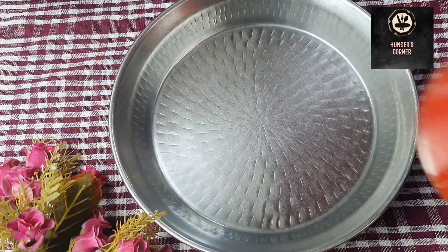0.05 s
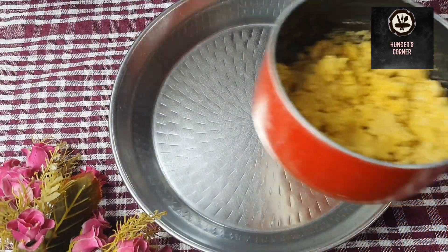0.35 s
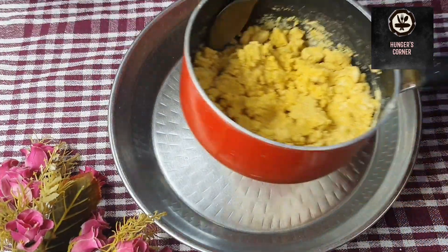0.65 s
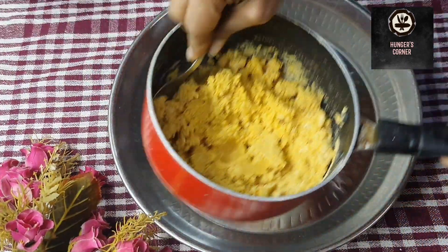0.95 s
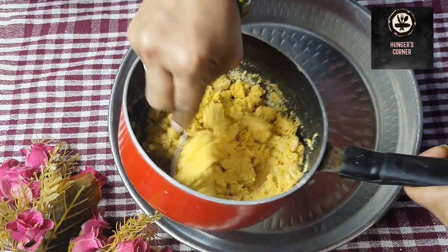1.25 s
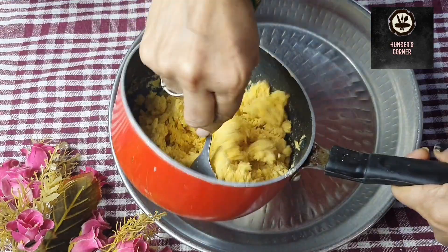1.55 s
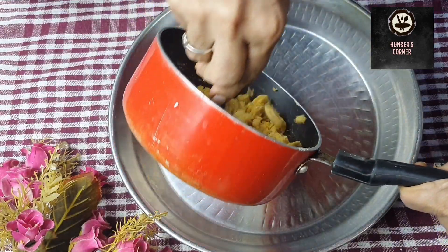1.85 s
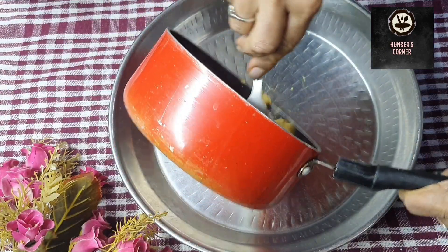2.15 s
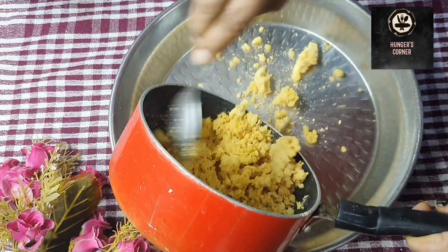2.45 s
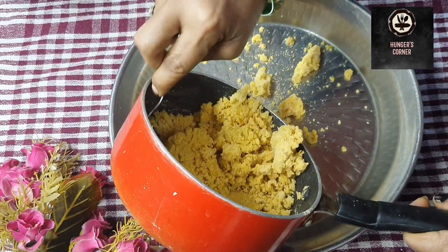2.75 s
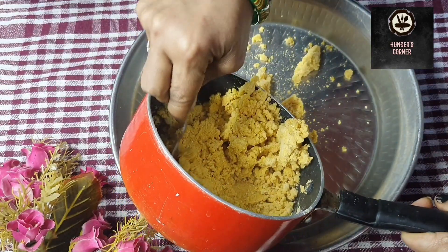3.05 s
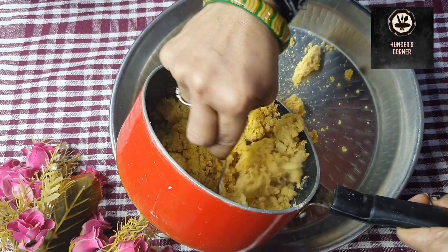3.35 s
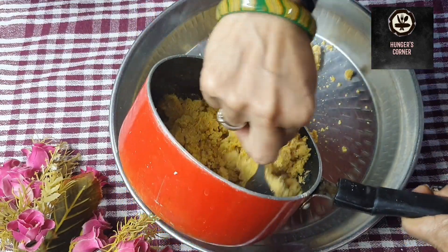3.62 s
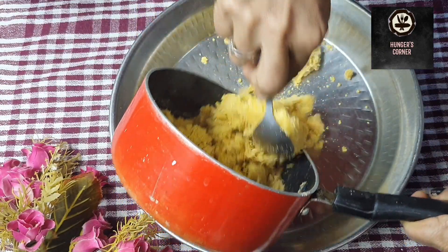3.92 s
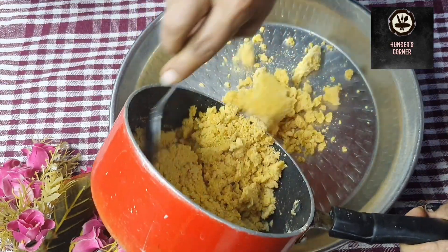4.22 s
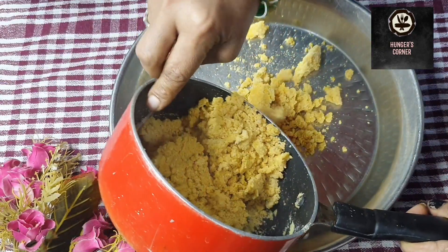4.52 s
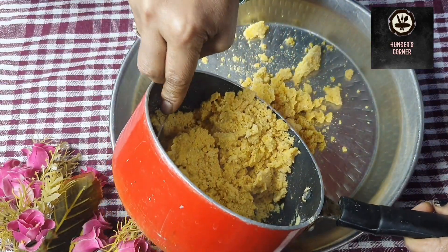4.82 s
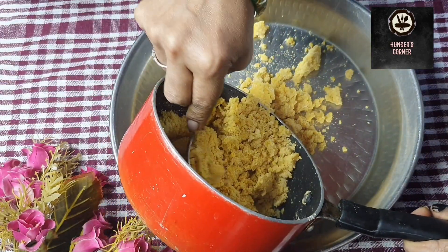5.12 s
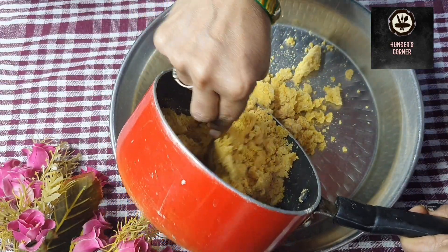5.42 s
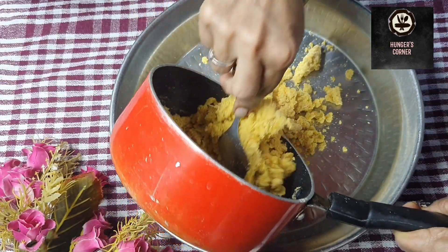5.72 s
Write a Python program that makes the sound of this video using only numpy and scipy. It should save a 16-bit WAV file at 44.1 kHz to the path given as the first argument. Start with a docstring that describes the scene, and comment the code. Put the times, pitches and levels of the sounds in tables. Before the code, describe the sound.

Gritty spoon scrapes and sharp clinks in a saucepan, with a few booming bumps on a steel plate in a small kitchen.

```python
"""Cloth swishes, then a metal spoon knocks and scrapes crumbly food out of a saucepan in a small kitchen.
Each knock excites the damped modes of wall, bottom and spoon; stick-slip friction sounds the pan's hollow.
The pan bumps a steel plate below it, which rings and booms on the table, and crumbs patter down.
Near walls add a short reverberation, and a low hum runs underneath."""
import sys
import numpy as np
from scipy import signal
from scipy.io import wavfile
from scipy.ndimage import uniform_filter1d

SR = 44100
rng = np.random.default_rng(int(sys.argv[2]) if len(sys.argv) > 2 else 0)


def transcribe(u):
    """Save the signal u as a 16-bit wav file named by the first command-line argument.

    u: samples, shape (n,) or (channels, n), limited to [-1, 1]; the rate is SR.
    q: integer samples, one column per channel.
    """
    v = np.clip(np.atleast_2d(u).T, -1, 1)
    q = np.round(v * 32767).astype(np.int16)
    wavfile.write(sys.argv[1], SR, q)


N = 259256
TIME = np.arange(N) / SR
AGE = np.arange(SR) / SR  # seconds since a blow
# spoon modes: frequency_hz, t60_s, gain_db
SPOON_MODES = [(360, 0.21, -6), (1795, 0.2, -3.5), (1806, 0.29, -3.5), (2610, 0.21, 6.5),
               (4760, 0.15, -8.5), (4737, 0.15, 4), (4940, 0.11, -11), (6040, 0.11, -9.5),
               (7520, 0.12, -12), (8020, 0.04, -6.5), (9400, 0.12, -25.5), (10550, 0.099, -25)]


def spoon_knocks():
    """Modal excitation: a blow rings wall, bottom and spoon; its height weights the wall's modes."""
    # start_s, clack_db, tilt_db_per_octave, contact_s, left_db, wall_db, height_0_to_1,
    # spoon_db, bottom_db
    knocks = [(0.7258, -35, -3.5, 0.0013, 3.5, -42, 0, -48.5, -35.5),
              (0.7979, -27.5, -1, 0.00031, -1, -68, 0.5, -66, -32),
              (1.2405, -55.5, 7, 0.0024, 4, -60.5, 0, -87, -44),
              (1.279, -55.5, 0.5, 0.003, -1.5, -61, 0, -79.5, -45.5),
              (2.636, -32.5, 1.16, 0.0048, 1.5, -30, 1, -40.5, -40),
              (2.948, -55, -1, 0.0049, 4.5, -54, 0.15, -69, -77.5),
              (3.701, -59.5, 2.5, 0.0068, 6, -51.5, 0.35, -80, -57.5),
              (4.31, -59, -4.5, 0.0047, 2.5, -62.5, 0.4, -78, -75.5),
              (4.4346, -22.5, 6, 0.0036, 2, -35.5, 0.7, -21.5, -55),
              (4.7330, -55, -9.5, 0.011, -2.5, -47.5, 0.24, -73, -49.5),
              (5.1590, -52, 3.5, 0.012, 3.5, -26.5, 0.05, -54, -44),
              (5.1900, -51, -1, 0.013, 4, -40.5, 0.6, -81, -45.5),
              (5.512, -65.5, -9, 0.0032, 1, -66, 0, -97, -66)]
    # pan wall modes: frequency_hz, t60_s, struck_low_db, struck_at_rim_db
    wall_modes = [(227.7, 0.13, -7, -23), (452, 0.29, -19, -28), (675, 0.23, -10, -20.5),
                  (789, 0.18, -19.5, -9.5), (888, 0.22, -2, -13), (935, .15, -16, -10),
                  (1130, 0.13, -1, -40), (1161.5, 0.17, -1, -22.5), (1408, 0.1, -4.5, 6),
                  (1517, 0.094, 0.5, -26.5), (1562, 0.1, 6, -31.5), (1852, 0.2, -8.5, -21.5),
                  (2223, 0.18, -36.5, -0.5), (2253, 0.28, -12, -18), (3110, 0.15, -25.5, -7.5),
                  (3215, .14, -21, -14), (3521, 0.16, -17, -11), (3815, .12, -25, -15),
                  (4200, 0.07, -23, -18.5)]
    # pan bottom modes, damped by food: frequency_hz, t60_s, gain_db
    bottom_modes = [(313, 0.14, -12), (730, 0.03, 2), (821, 0.2, -1), (886, 0.033, 7.5), (1322, 0.28, -5.5)]
    # the pan's dense modes: frequency_hz, gain_db
    spectrum = [(100, -20.5), (330, -4.5), (530, -5), (800, -6.5), (1100, -4), (1450, 4.5), (2300, -1),
                (3300, -6), (5000, -10.5), (8000, -19), (14000, -28.5)]
    hz, t60, low_db, rim_db = np.transpose(wall_modes)
    spoon_hz, spoon_t60, mode_db = np.transpose(SPOON_MODES)
    octaves = np.log2(np.maximum(spoon_hz / 2600, 1))
    out = np.zeros((2, N))
    for s, db, tilt, contact, left_db, wall_db, height, spoon_db, bottom_db in knocks:
        wall = np.transpose([hz, t60, low_db + height * (rim_db - low_db)])
        # a hard, bright blow reaches the spoon's high modes
        spoon = np.transpose([spoon_hz, spoon_t60, mode_db + 2.22 * tilt * octaves])
        sound = gain_of(db) * clack(spectrum, tilt, contact, body_db=-14, decay_s=0.014, shared=0.046)
        sound += gain_of(wall_db) * ring(wall, contact, apart_rad=1.7, wobble=0.0064)
        sound += gain_of(spoon_db) * ring(spoon, contact / 2, apart_rad=0.46, wobble=0.011)
        sound += gain_of(bottom_db) * ring(bottom_modes, contact / 2, apart_rad=0.83, wobble=0.065)
        add(out, s, placed(sound, left_db))
    return out


def plate_bumps():
    """Impact and coupling: the pan strikes the plate, and once a lump of food drops onto it; the plate clacks,
    rings and booms on the table."""
    # start_s, clack_db, tilt_db_per_octave, contact_s, left_db, ring_db, boom_db
    bumps = [(1.8026, -24.5, 4.5, 0.0043, 3.5, -32.5, -24), (1.8650, -31.5, -3, 0.0029, 0, -53, -33),
             (2.3281, -47.5, 2.5, 0.008, 3.5, -52.5, -50), (2.722, -56.5, -13, 0.0036, -19, -72, -69),
             (2.9900, -35, -0.5, 0.0044, 2, -54, -41), (3.1407, -36.5, -1, 0.0039, 3.5, -71, -41.5),
             (3.192, -53, -3.5, 0.0054, -6, -69, -47.5), (5.19, -65, -9, 0.0067, -2.5, -52.5, -55.5)]
    # steel plate modes: frequency_hz, t60_s, gain_db
    plate_modes = [(318, 0.38, 1.5), (357.7, 0.24, 3), (422, 0.25, 2), (484, 0.39, -0.5),
                   (687, 0.27, -11.5), (1110, 0.11, 10.5), (1313, 0.21, 6.5), (1650, 0.076, -5.5),
                   (1868, 0.3, 5), (2030, 0.65, -5), (3435, 0.12, -5.5), (5100, 0.16, 6), (5230, 0.2, -5.5),
                   (5850, 0.28, -9.5), (6880, 0.47, -14.5)]
    # the plate bouncing on the table: frequency_hz, t60_s, gain_db
    boom_modes = [(77.5, 0.44, -2), (107.7, .25, 0), (147.5, 0.39, -5), (178, 0.33, -4), (192.6, 0.11, 7.5),
                  (231.6, 0.26, -10)]
    # the plate's dense modes: frequency_hz, gain_db
    spectrum = [(100, -16.5), (200, -6), (420, -2.5), (580, -4), (1100, 2), (2000, 2), (3000, -3),
                (4000, -9), (5200, -4), (6800, -12), (8200, -19), (14000, -26)]
    hz, t60, mode_db = np.transpose(boom_modes)
    hardest_db = max(row[-1] for row in bumps)
    out = np.zeros((2, N))
    for s, db, tilt, contact, left_db, ring_db, boom_db in bumps:
        sound = gain_of(db) * clack(spectrum, tilt, contact, body_db=-9, decay_s=0.02, shared=0.18)
        sound += gain_of(ring_db) * ring(plate_modes, contact, apart_rad=0.71, wobble=0.0033)
        # a softer bump moves mainly the lowest mode
        modes = np.transpose([hz, t60, mode_db + 0.67 * (boom_db - hardest_db) * np.log2(hz / hz[0])])
        boom = gain_of(boom_db) * ring(modes, rise_s=0.0081, apart_rad=0.35, wobble=0.062)
        add(out, s, placed(sound, left_db) + placed(boom, left_db=5))
    return out


def scraping():
    """Stick-slip friction: the spoon's edge slips on grit and metal, hisses and drives resonances."""
    # peak_s, rise_s, hold_s, release_s, rub_db, hiss_db, hollow_hz, hollow_db
    strokes = [(0.734, 0.046, 0.17, 0.078, -52, -55.5, 800, 2.5),
               (0.877, 0.042, .02, 0.054, -42, -49, 787, 3.5),
               (0.903, 0.038, 0.031, 0.17, -35.5, -44.5, 814, -4),
               (1.076, 0.031, 0.0031, 0.047, -46, -53, 820, -3),
               (1.359, 0.27, 0.013, 0.04, -51, -54, 825, 2.5), (1.401, 0.022, .12, 0.067, -56, -62, 800, 7),
               (2.069, 0.24, 0.038, 0.13, -55, -58.5, 1240, -10.5),
               (2.267, 0.074, 0.017, 0.055, -50.5, -52.5, 1240, -21.5),
               (2.346, 0.08, 0.13, 0.33, -56, -59.5, 1190, -0.5),
               (3.258, 0.085, 0.068, 0.013, -46.5, -62.5, 1050, 2),
               (3.33, 0.076, .008, .12, -77, -57.5, 1478, -16.5),
               (3.656, 0.18, .005, 0.14, -68.5, -63, 900, 4),
               (3.726, 0.09, 0.068, 0.034, -61, -70, 890, 6.5),
               (3.909, 0.065, .03, 0.073, -66, -59, 2250, -1),
               (3.953, 0.04, 0.013, .06, -52, -54.5, 2320, 0.5),
               (3.988, .03, 0.0073, .04, -49, -58, 2000, -3),
               (4.163, .03, 0.075, 0.41, -62.5, -71.5, 1180, -8),
               (4.841, 0.3, .04, 0.29, -64, -72.5, 980, -0.5),
               (5.062, 0.15, 0.0074, 0.11, -55, -66.5, 1000, 8.5),
               (5.155, .04, 0.034, 0.05, -62, -70, 1000, 7),
               (5.553, 0.24, 0.0067, 0.065, -56.5, -66.5, 1055, 5)]
    # wall resonances: frequency_hz, half_width_hz, gain_db
    wall_modes = [(1395, 170, -4), (1895, 79, -2.5), (2160, 100, -4), (3295, 73, -12.5)]
    # broadband rubbing: frequency_hz, gain_db
    rub_spectrum = [(100, -34), (350, 4), (560, -5), (900, 9.5), (2200, 0.5), (2700, -9), (5000, -32.5)]
    # gritty hiss: frequency_hz, gain_db
    grit_spectrum = [(1500, -51.5), (2750, 13), (3200, 5), (3600, 4.5), (4200, 1.5), (4800, 0), (5700, -6),
                     (6600, 1), (7700, -7), (8600, -9.5), (11000, -8.5), (14500, -14)]
    s, _, _, _, rub_db, hiss_db, hollow_hz, hollow_db = np.transpose(strokes)
    pressure = sum(movement(*row[:4], db) for row, db in zip(strokes, rub_db))
    hiss_gain = sum(movement(*row[:4], db) for row, db in zip(strokes, hiss_db))
    catching = evened(uniform_filter1d(uniform_filter1d(rng.standard_normal(N), size=400), size=300))
    slips = grains(per_s=3100, spread_db=1.5, shared=0.25) * gain_of(1.8 * catching)
    # the spoon's place in the food tunes the hollow, which glides from stroke to stroke
    hollow = resonate_twice(slips, np.interp(TIME, s, hollow_hz), width_hz=290)
    hollow *= gain_of(np.interp(TIME, s, hollow_db))
    wall = sum(gain_of(db) * resonate_twice(slips, hz, 2 * half) for hz, half, db in wall_modes)
    body = evened(evened(hollow + wall) + gain_of(-13) * coloured(slips, rub_spectrum))
    # the edge also stirs the spoon's high modes, damped by the food
    spoon = evened(sum(resonate(slips, hz, width_hz=40) for hz, _, _ in SPOON_MODES if hz > 4000))
    grit = coloured(slips + gain_of(-17) * spoon, grit_spectrum)
    rub = pressure * body + hiss_gain * grit
    # the filled pan radiates little between two groups of its modes
    return placed(rub - 0.78 * resonate(rub, hz=2800, width_hz=990), left_db=3)


def falling_crumbs():
    """Granular impacts: crumbs patter at random on the steel, and single lumps tick."""
    # showers: peak_s, rise_s, hold_s, release_s, level_db
    showers = [(2.399, 0.099, 0.025, 0.38, -56), (4.17, .03, .08, .12, -75)]
    # lumps landing: start_s, level_db
    lumps = [(2.415, -49), (2.4344, -46)]
    # food on steel: frequency_hz, gain_db
    spectrum = [(100, -7.5), (350, -5), (600, 0.5), (1100, -4.5), (1800, -6.5), (5000, -33)]
    patter = coloured(grains(per_s=860, spread_db=-1.5, shared=0.59), spectrum)
    out = sum(movement(*row) for row in showers) * patter
    for s, db in lumps:
        tick = clack(spectrum, tilt=0, contact_s=0.0003, body_db=0.5, decay_s=0.004, shared=0.78)
        add(out, s, gain_of(db) * tick)
    return out


def cloth_swishes():
    """Sliding friction: cloth makes broadband noise that swells with its speed."""
    # peak_s, rise_s, hold_s, release_s, level_db
    swishes = [(0.186, 0.14, 0.24, .1, -68), (0.452, 0.24, 0.045, 0.14, -53)]
    # frequency_hz, gain_db
    spectrum = [(180, -45), (300, -32), (430, -1), (515, -30), (568, -6), (647, -8), (775, -7.5),
                (1730, 6.5), (13400, -4), (15000, -15)]
    return sum(movement(*row) for row in swishes) * coloured(noise(N, shared=0.026), spectrum)


def hand_rustle():
    """Soft friction: the shifting hand makes a low band of noise."""
    # peak_s, rise_s, hold_s, release_s, level_db
    shifts = [(.005, 0.048, 0.065, 0.3, -67.5)]
    # frequency_hz, gain_db
    spectrum = [(120, -43), (290, 2), (420, -1), (650, -15), (1500, -26)]
    return sum(movement(*row) for row in shifts) * coloured(noise(N, shared=0.2), spectrum)


def kitchen(x):
    """Reverberation: dense reflections from near walls, each band dying at its own rate."""
    # frequency_hz, t60_s
    decay_times = [(100, 0.21), (260, .55), (700, 0.49), (1840, 0.48), (4850, 0.44), (12800, 0.42)]
    reflections = rng.standard_normal((2, SR)) * (rng.random((2, SR)) < 5000 / SR)
    build_up = 1 - np.exp(-(AGE / 0.0032) ** 2)
    hz, t, bands = signal.stft(reflections * build_up, SR, nperseg=256)
    fading = gain_of(-60 * t / value_at(decay_times, hz)[:, None])
    bass_cut = gain_of(value_at([(120, -14), (400, -11.5)], hz))[:, None]
    tail = signal.istft(bands * fading * bass_cut, SR, nperseg=256)[1]
    tail /= np.linalg.norm(tail, axis=1, keepdims=True)
    return signal.fftconvolve(x, tail, axes=1)[:, :N]


def background():
    """Stationary noise: broadband room air, with narrow bands heard as wavering hum and faint hiss."""
    # room air: frequency_hz, gain_db
    spectrum = [(25, -21.5), (60, -3), (95, 4), (150, -8), (200, -11), (600, -19), (1000, -28), (1700, -31),
                (2750, -38), (3500, -33.5), (4800, -25), (6000, -31.5), (14000, -35)]
    # hum and hiss: frequency_hz, width_hz, level_db
    bands = [(77.5, 16, -71), (143.3, 7.2, -73.5), (5190, 440, -93.5)]
    air = gain_of(-68) * coloured(noise(N, shared=0.12), spectrum)
    for hz, width_hz, db in bands:
        air += gain_of(db) * evened(resonate_twice(noise(N, shared=0.6), hz, width_hz))
    return air


def ring(modes, rise_s, apart_rad, wobble):
    """Damped free vibration: modes build up, then decay, wavering as the metal rattles."""
    hz, t60, db = np.transpose(modes)[:, :, None]
    start, side = rng.random((2, len(hz), 1))
    amplitude = gain_of(db - 60 * AGE / t60) / np.linalg.norm(gain_of(db))
    drift = np.repeat(rng.standard_normal((len(hz), 150)), SR // 150, axis=1)
    phase = 2 * np.pi * (start + hz * np.cumsum(1 + wobble * drift, axis=1) / SR)
    lag = apart_rad * np.sign(side - 0.5) / 2  # each mode meets the two microphones out of step
    stereo = np.array([(amplitude * np.sin(phase + shift)).sum(0) for shift in (lag, -lag)])
    return np.sqrt(2) * stereo * (1 - np.exp(-AGE / rise_s))


def clack(spectrum, tilt, contact_s, body_db, decay_s, shared):
    """Impact transient: chatter during the contact, then dense modes that die quickly."""
    chatter = AGE / contact_s * np.exp(1 - AGE / contact_s)
    body = gain_of(body_db) * np.exp(-AGE / decay_s) * (1 - np.exp(-AGE / contact_s))
    envelope = np.hypot(chatter, body)
    return coloured(envelope * noise(SR, shared), spectrum, tilt) * np.sqrt(np.mean(envelope ** 2))


def grains(per_s, spread_db, shared):
    """Shot noise: tiny bursts of random time and size."""
    size = gain_of(spread_db * np.minimum(rng.exponential(1, N), 4)) * (rng.random(N) < per_s / SR)
    energy = signal.lfilter([1], [1, -np.exp(-1 / (0.0011 * SR))], size ** 2)
    return evened(np.sqrt(energy) * noise(N, shared))


def movement(peak_s, rise_s, hold_s, release_s, db, fade_db=41.5, sag_db_per_s=20):
    """Exponential envelope: it swells to a peak, sags while held, and lets go."""
    before = np.maximum(peak_s - TIME, 0) / rise_s
    after = np.maximum(TIME - peak_s - hold_s, 0) / release_s
    return gain_of(db - fade_db * (before + after) - sag_db_per_s * np.clip(TIME - peak_s, 0, hold_s))


def resonate(x, hz, width_hz):
    """Resonance of gain 1 whose frequency may glide."""
    carrier = np.exp(2j * np.pi * np.cumsum(hz * np.ones(N)) / SR)
    pole = np.exp(-np.pi * width_hz / SR)
    return 2 * (carrier * signal.lfilter([1 - pole], [1, -pole], x / carrier)).real


def resonate_twice(x, hz, width_hz):
    """Two resonances in cascade, each width_hz wide."""
    return resonate(resonate(x, hz, width_hz), hz, width_hz)


def coloured(x, spectrum, tilt=0):
    """Minimum-phase filter, tilted in dB per octave above 600 Hz; output rms 1."""
    hz = abs(np.fft.fftfreq(4096, 1 / SR))
    log_gain = np.log(gain_of(value_at(spectrum, hz) + tilt * np.log2(np.maximum(hz, 600))))
    taps = np.fft.ifft(np.exp(signal.hilbert(log_gain).conj())).real
    return evened(signal.oaconvolve(x, taps[None], axes=1)[:, :x.shape[1]])


def noise(size, shared):
    """Partly coherent stereo white noise."""
    white = rng.standard_normal((3, size))
    return np.sqrt(shared) * white[2] + np.sqrt(1 - shared) * white[:2]


def placed(x, left_db):
    """Level difference: left over right."""
    return x * gain_of([[left_db / 2], [-left_db / 2]])


def add(mix, start_s, sound):
    """Superpose a sound on the mix."""
    part = mix[:, round(start_s * SR):][:, :sound.shape[1]]
    part += sound[:, :part.shape[1]]


def value_at(points, hz):
    """Interpolate on a log-frequency axis."""
    point_hz, value = np.transpose(points)
    return np.interp(np.log(hz + 1), np.log(point_hz + 1), value)


def gain_of(db):
    """Decibels to amplitude."""
    return 10 ** (np.asarray(db) / 20)


def evened(x):
    """Scale to rms 1."""
    return x / np.sqrt(np.mean(x ** 2) + 1e-20)


def scene():
    """Superposition of direct sound, reverberation and background."""
    direct = spoon_knocks() + plate_bumps() + scraping()
    direct += cloth_swishes() + hand_rustle() + falling_crumbs()
    return direct + gain_of(-4.5) * kitchen(direct) + background()


def record(dry):
    """Long waves reach two close microphones alike, so the bass narrows; a low-pass limits the band."""
    side = (dry[0] - dry[1]) / 2
    bass_side = signal.sosfiltfilt(signal.butter(2, 420, fs=SR, output="sos"), side)
    heard = dry - 0.6 * np.array([bass_side, -bass_side])
    low_pass = signal.firwin(511, 14950, window=("kaiser", 8), fs=SR)
    return signal.oaconvolve(heard, low_pass[None], "same")


dry = scene()
out = record(dry)
transcribe(out)
```